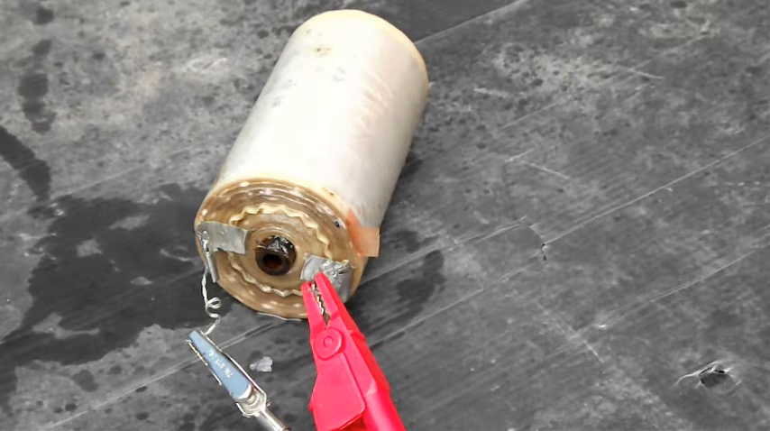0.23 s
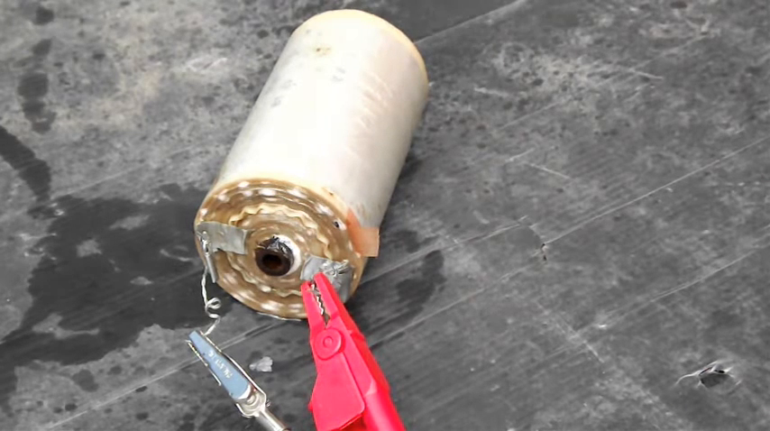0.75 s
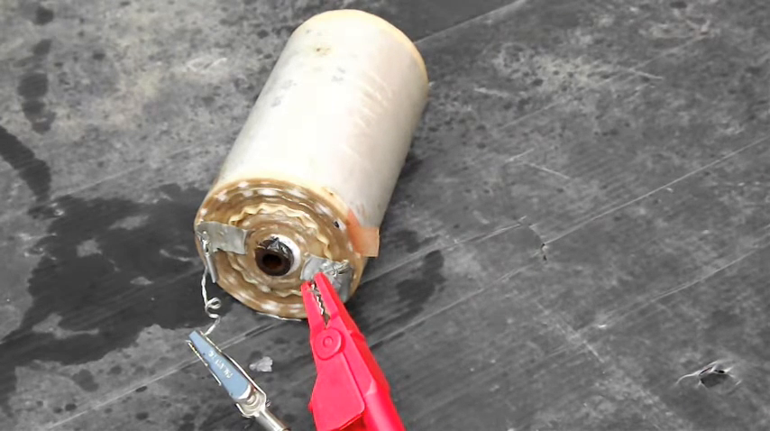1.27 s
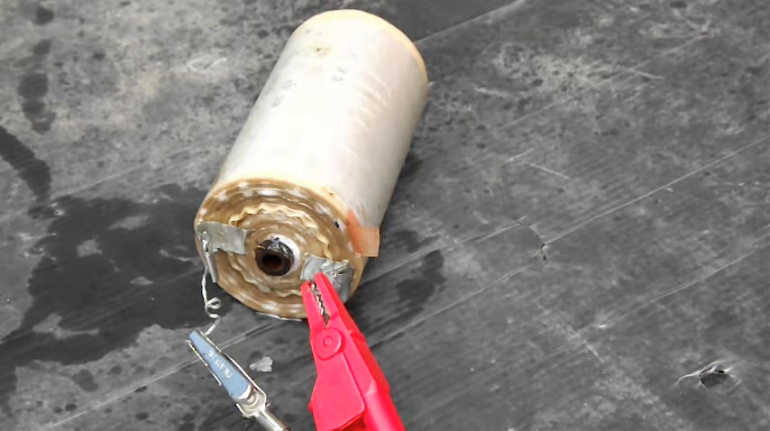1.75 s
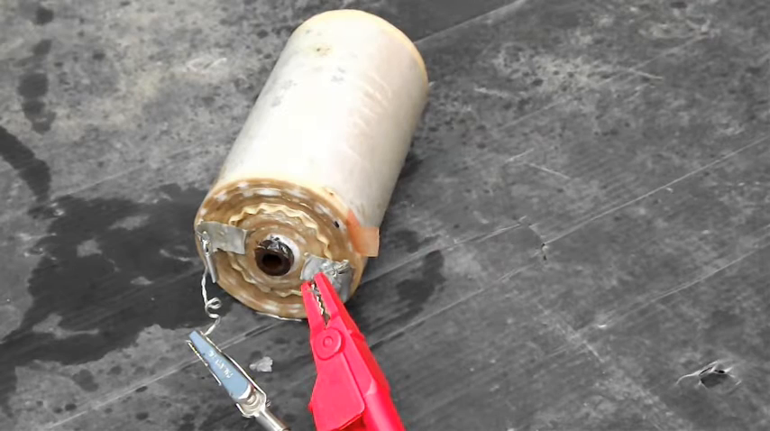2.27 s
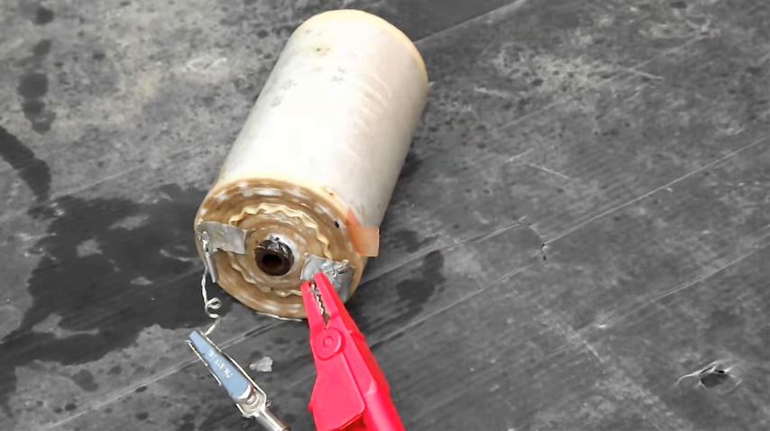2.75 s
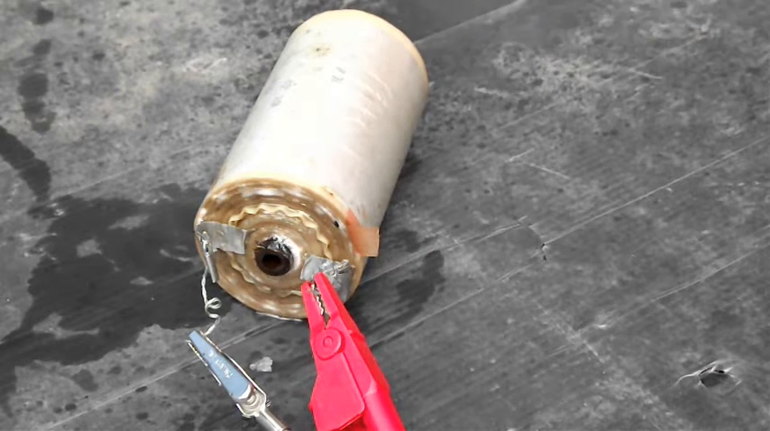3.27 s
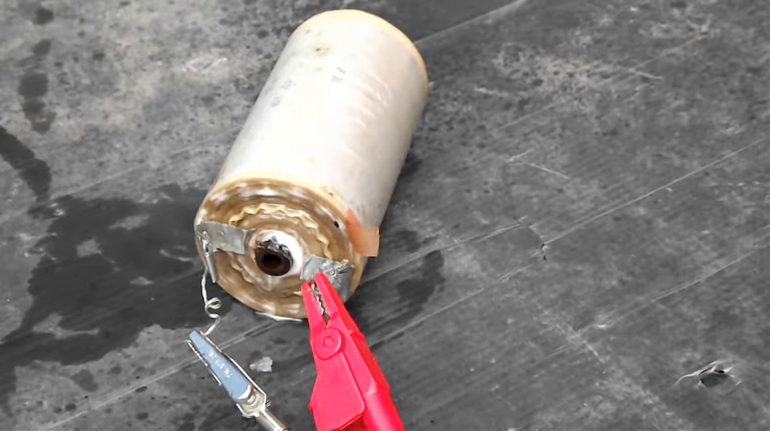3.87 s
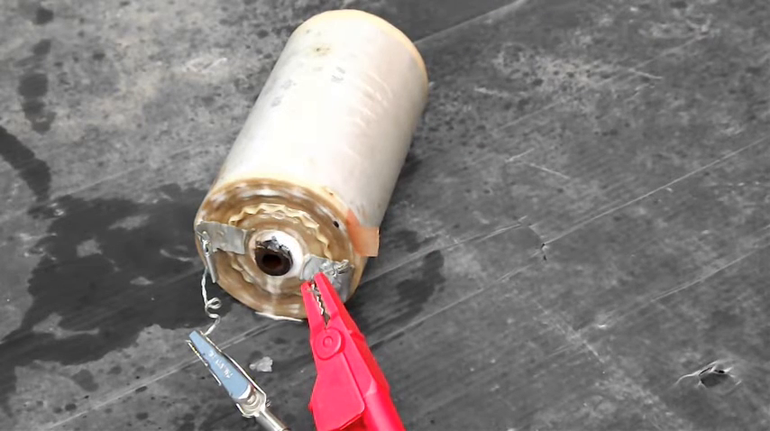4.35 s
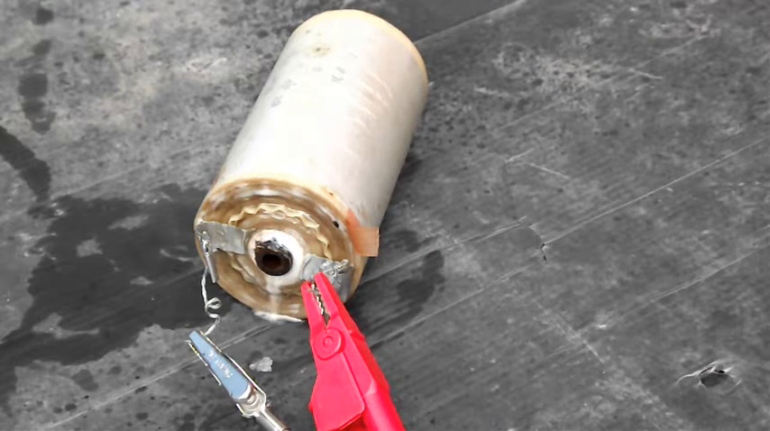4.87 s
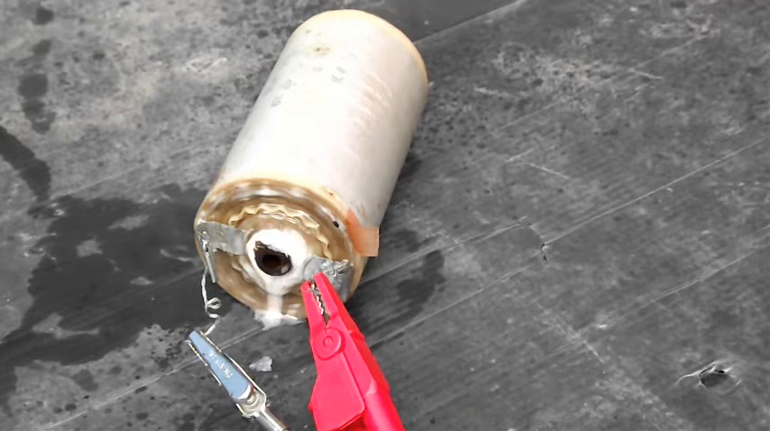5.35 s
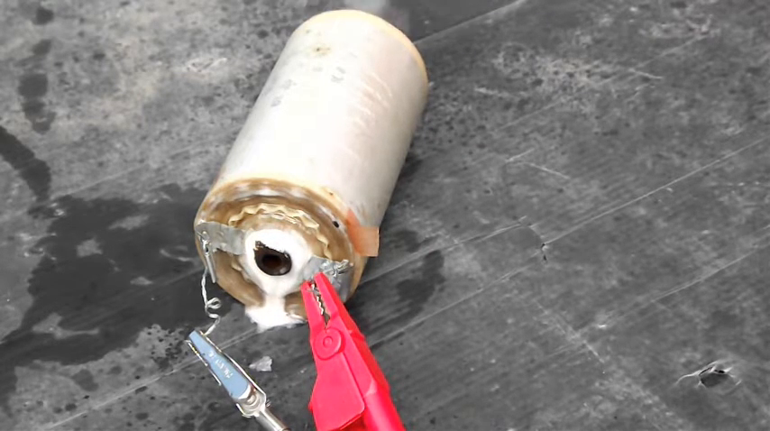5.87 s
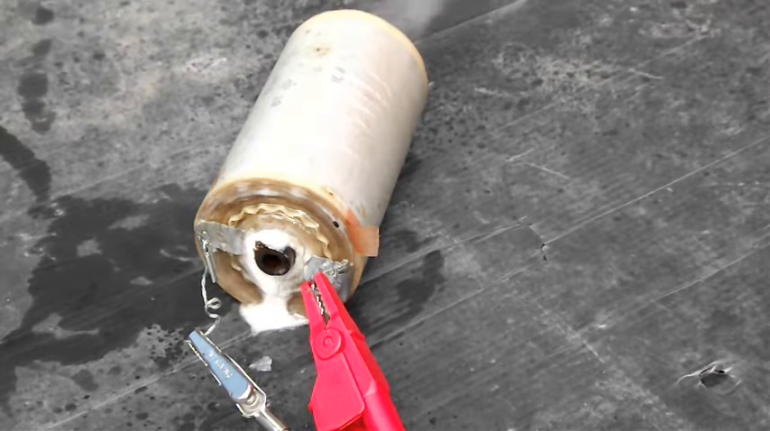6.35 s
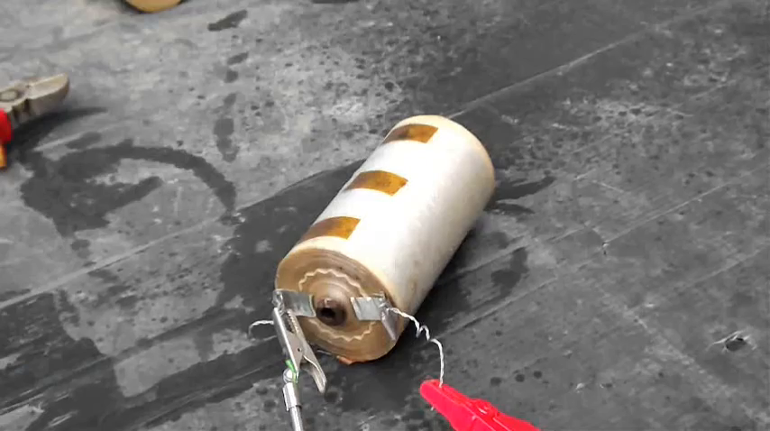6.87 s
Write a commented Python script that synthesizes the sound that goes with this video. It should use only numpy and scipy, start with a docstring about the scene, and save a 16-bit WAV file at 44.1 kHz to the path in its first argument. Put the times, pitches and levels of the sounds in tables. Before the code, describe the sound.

Outdoors on a concrete yard, a soft far-traffic hiss and gusty low wind run throughout, with a faint 64 Hz engine drone sinking away and stopping by 1.8 s. At 0.23-0.45 s a violent ragged cluster of electrical cracks bursts out, hardest around 0.31 s, with a deep puff of gas, then sizzle and dull knocks until 0.8 s. Calm follows, broken by low bumps at 2.3 s and one snap at 2.7 s. From 3.0 to 3.4 s comes a rapid bright volley, strongest at 3.15 s, then slight sizzle and bumps. More cracks snap at 4.7 s and heavily at 5.05-5.15 s. A softer gassy pop gushes at 5.6 s, then faint fizzy ticks until 6.2 s. At 6.86 s nearer traffic rushes in abruptly with a knock. The close microphone rings near 3 kHz, overloads on peaks and dips the background after loud cracks.

```python
"""Sparks crack and ring in a wound capacitor element that breaks down under voltage on a concrete yard.
Each spark is a burst of fading noise sent through a ring, a snap and a bass filter, with echoes after it.
Dull knocks, one puff of gas and two soft gushes join in, and hot wax sizzles as filtered grainy noise.
Behind them are a far town, wind and an engine drone, and a rush of nearer traffic sets in near the end.
The close microphone resonates near 3 kHz, turns itself down after loud cracks and overloads on peaks."""
import sys
import numpy as np
from scipy import signal
from scipy.fft import rfft, irfft
from scipy.io import wavfile
from scipy.ndimage import uniform_filter1d, minimum_filter1d

SR = 44100
rng = np.random.default_rng(int(sys.argv[2]) if len(sys.argv) > 2 else 0)


def wav_out(sig):
    """Save sig, one row per channel (or a flat mono array), as 16-bit PCM at SR to the path in sys.argv[1]."""
    wavfile.write(sys.argv[1], SR, np.round(np.clip(np.atleast_2d(sig).T, -1, 1) * 32767).astype(np.int16))


N = 314163  # length in samples, about 7.1 s


def undb(db):
    """Turn decibels into a plain factor."""
    return 10 ** (np.asarray(db) / 20)


def unit(x):
    """Scale a sound to an rms level of 1."""
    return x / np.sqrt(np.mean(x ** 2))


def band(x, hz, width_hz):
    """Two-pole resonance, gain 1 at the centre."""
    return signal.lfilter(*signal.iirpeak(hz, hz / width_hz, fs=SR), x)


def low(x, hz):
    """Take away the treble above hz with a gentle two-pole filter."""
    return signal.lfilter(*signal.butter(2, min(hz, .45 * SR), fs=SR), x)


def coloured(spectrum):
    """Noise of rms 1 with a (Hz, dB) spectrum, practically silent outside it."""
    hz, db = np.transpose(spectrum)
    f = np.fft.rfftfreq(N, 1 / SR) + 1e-9  # the tiny offset avoids log(0)
    shape = undb(np.interp(np.log(f), np.log(hz), db, left=-90, right=-120))
    white = rng.standard_normal(N)
    return unit(irfft(rfft(white) * shape, N))


def walk(rate):
    """Random wander of spread 1: levels held for 1 / rate seconds, smoothed twice."""
    k = int(SR / rate)
    steps = np.repeat(rng.standard_normal(N // k + 1), k)
    return unit(uniform_filter1d(uniform_filter1d(steps, k), k)[:N])


def fade(t, t60):
    """Exponential fade that loses 60 dB in t60 seconds (1 ms at least)."""
    return np.exp(-np.log(1000) * t / max(t60, 1e-3))


def add(out, s, sound):
    """Mix a sound into out, starting at s seconds."""
    i = int(s * SR)
    out[i:i + len(sound)] += sound[:len(out) - i]


# Colour of the far town murmur. Each row: frequency in Hz, relative strength in dB per Hz.
TOWN_SPECTRUM = [(90, -6), (150, -3), (300, -6.5), (600, -9.5), (1000, -6.5), (2000, -11.5), (3200, -7.5),
                 (5000, -17.5), (7000, -26), (10000, -33), (15200, -37), (15500, -70)]
# Loudness curve of the town before its small swells. Each row: time in seconds, level in dB.
TOWN_LEVEL = [(0, -46.5), (3.4, -47.5), (4.8, -44.5), (5.6, -45), (6.2, -45.5), (7.13, -45)]
TOWN_SWELL_DB = .6


def town(t):
    """Smooth far traffic: coloured noise whose level swells a little at random."""
    level_db = np.interp(t, *np.transpose(TOWN_LEVEL))
    return coloured(TOWN_SPECTRUM) * undb(level_db + TOWN_SWELL_DB * walk(3.91) + .5 * walk(17))


# Colour of the wind rumble. Each row: frequency in Hz, relative strength in dB per Hz.
WIND_SPECTRUM = [(15, 1.5), (30, -3.5), (60, -7), (110, -12), (200, -73)]
# Loudness curve of the wind before its gusts. Each row: time in seconds, level in dB.
WIND_LEVEL = [(0, -46), (3.0, -50.5), (3.9, -46.5), (4.6, -47), (5.4, -50), (6.2, -50), (7.13, -46.5)]


def wind(t):
    """Gusty rumble: very low noise with a wandering level."""
    level_db = np.interp(t, *np.transpose(WIND_LEVEL))
    return coloured(WIND_SPECTRUM) * undb(level_db + 1.2 * walk(5.13))


DRONE_HZ, DRONE_WAVER_HZ = 64., 3.
DRONE_DB, DRONE_SINK_DB_PER_S, DRONE_FLICKER_DB = -41.5, 4, 1.5
DRONE_STOP_S, DRONE_RELEASE_S = 1.65, 0.16


def drone(t):
    """Low engine drone: a sine of wavering pitch."""
    level_db = DRONE_DB - DRONE_SINK_DB_PER_S * t  # the engine draws away, then stops
    pitch_hz = DRONE_HZ + DRONE_WAVER_HZ * walk(9.9)
    tone = np.sin(2 * np.pi * np.cumsum(pitch_hz) / SR)
    stop = np.clip(1 - (t - DRONE_STOP_S) / DRONE_RELEASE_S, 0, 1)
    return tone * undb(level_db + DRONE_FLICKER_DB * walk(3.8)) * stop


# Colour of the nearer traffic. Each row: frequency in Hz, relative strength in dB per Hz.
RUSH_SPECTRUM = [(60, 2), (180, 1), (500, -6), (1200, -11.5), (2500, -8.5), (5000, -19), (8000, -29),
                 (11000, -39)]
RUSH_S, RUSH_ATTACK_S, RUSH_DB = 6.858, 0.0067, -38


def rush(t):
    """Broad rush of nearer traffic: flickering noise that sets in within milliseconds near the end."""
    onset = np.clip((t - RUSH_S) / RUSH_ATTACK_S, 0, 1)
    return coloured(RUSH_SPECTRUM) * undb(RUSH_DB + 1.0 * walk(30)) * onset


# Spells of sizzling hot wax between and around the sparks.
# Each row: start in seconds, hold in seconds, level in dB.
SIZZLES = [(0.458, 0.05, -38), (3.448, 0.015, -47.5), (3.602, .03, -55), (4.613, .07, -44),
           (5.173, .025, -39), (5.515, .005, -51)]
# Rings of the gaps in the winding. Each row: centre in Hz, filter width in Hz, strength in dB.
WAX_RINGS = [(2400, 400, -1), (2900, 500, 0), (5100, 200, 2), (5750, 200, -1), (6800, 2500, -11),
             (8300, 450, -8), (11000, 2500, -17)]
SIZZLE_ATTACK_S, SIZZLE_RELEASE_S, SIZZLE_GRAIN_DB = 0.027, 0.054, 2.5


def sizzle(t):
    """Dense bubble bursts in the wax, ringing in the gaps of the winding: grainy noise through resonances."""
    gain = np.zeros(N)
    for s, hold_s, db in SIZZLES:
        rise = (t - s) / SIZZLE_ATTACK_S
        fall = 1 - (t - s - SIZZLE_ATTACK_S - hold_s) / SIZZLE_RELEASE_S
        gain += undb(db) * np.clip(np.minimum(rise, fall), 0, 1) ** 2
    grains = rng.standard_normal(N) * undb(SIZZLE_GRAIN_DB * walk(120))
    rings = sum(undb(db) * band(band(grains, hz, width), hz, width) for hz, width, db in WAX_RINGS)
    return gain * unit(rings)


# Low knocks and bumps nearby. Each row: start in seconds, peak in dB, centre in Hz.
THUDS = [(0.329, -24.5, 216), (0.561, -29, 175), (0.599, -35, 155.2), (0.655, -34, 191), (0.683, -37, 257),
         (0.764, -32, 196), (0.819, -37, 194), (2.294, -29, 304), (2.35, -35.5, 229), (3.621, -39, 266),
         (3.698, -38, 248), (5.343, -32.5, 326), (5.408, -31.5, 284), (5.595, -29, 162), (6.869, -26, 398),
         (6.96, -36, 186)]
THUD_T60_S, THUD_TOP_HZ = 0.21, 398


def thuds():
    """Dull knocks: a click and a fading noise tail in a wide low resonance."""
    out, t = np.zeros(N), np.arange(SR // 4) / SR
    for s, db, hz in THUDS:
        hit = (rng.standard_normal(len(t)) + 22.0 * (t == 0)) * fade(t, THUD_T60_S)
        knock = low(low(band(hit, hz, 0.82 * hz), THUD_TOP_HZ), THUD_TOP_HZ)
        add(out, s, undb(db) * knock / np.abs(knock).max())
    return out


# Soft gushes of gas in the late pop. Each row: start in seconds, level before the fade in dB,
# time to fade by 60 dB in seconds.
GUSHES = [(5.596, -27, 0.1), (5.611, -32.5, 0.31)]
GUSH_HZ, GUSH_WIDTH_HZ, GUSH_ATTACK_S = 1290, 3800, .002


def gushes():
    """Gas escaping softly: a wide band of noise that starts fast and fades, cut off after a quarter second."""
    out, t = np.zeros(N), np.arange(SR // 4) / SR
    for s, db, t60 in GUSHES:
        hiss = unit(low(band(rng.standard_normal(len(t)), GUSH_HZ, GUSH_WIDTH_HZ), 2900.0))
        add(out, s, undb(db) * hiss * (1 - np.exp(-t / GUSH_ATTACK_S)) * fade(t, t60))
    return out


# Puff of gas from the strongest blow-out. Each row: moment of the swing in seconds,
# peak before smoothing in dB, time constants of suction and push in seconds.
BLASTS = [(.3246, -6.0, .0025, .004)]


def blast(t):
    """One deep swing of air pressure: suction grows, flips to a push and dies away."""
    out = np.zeros(N)
    for s, db, suction_s, push_s in BLASTS:
        u = t - s
        swing = np.sign(u) * np.exp(-np.abs(u) / np.where(u < 0, suction_s, push_s))
        out += undb(db) * uniform_filter1d(swing, size=60)  # rounds the sharp flip
    return out


# Sparks. Each row: start in seconds, peak of the ring in dB, ring in Hz, time for the arc to fade
# by 60 dB in seconds, snap and bass in dB against the ring. Peaks are before the treble softening.
CRACKS = [(0.2343, -11, 3760, 0.0051, 2, -14), (0.3043, -3, 3400, 0.0073, 12, -11),
          (0.3139, 2.5, 2940, 0.024, 5.5, -18), (0.3227, -6, 5900, .01, -1, -1.5),
          (0.342, -14, 4900, .004, 12, -12), (0.3465, -17, 2840, .004, -6, -6),
          (0.3842, -21, 2840, 0.0043, 6.5, -18), (0.4235, -18, 2360, 0.0055, 2, -4),
          (0.4538, -18.5, 4940, 0.0072, -4, -2), (0.7428, -33, 2810, .005, 0, -24),
          (2.6996, -19.5, 2620, 0.0074, 3.5, -25), (3.0174, -6, 4900, 0.0068, -0.5, -26),
          (3.0583, -12, 4830, 0.007, 3, -29), (3.078, -18, 4060, 0.0047, 3, -15),
          (3.0968, -14, 4520, 0.0062, 6, -32), (3.1281, -10, 4080, 0.0059, 7, -32),
          (3.149, 4, 5050, 0.017, 6, -1), (3.159, -6, 4070, 0.0051, 4, -26),
          (3.2073, -16, 3360, 0.0026, 3, -13), (3.2182, -18, 3500, 0.0033, 2, -17),
          (3.2591, -15.5, 3630, 0.005, 4.5, -1), (3.3071, -13, 3880, 0.0048, -3, -14),
          (3.32, -27, 8980, .004, -7, -1), (3.3686, -13.5, 4330, 0.0074, 4, -22),
          (4.684, -14.5, 4800, 0.0065, -1.5, -26), (4.735, -16.5, 3100, 0.0092, 2.5, -25),
          (4.7662, -7.5, 5200, 0.0066, 4.5, -22), (4.7854, -13.5, 3170, .006, 2.5, -18),
          (5.0541, -9.5, 2570, .012, -1, -8), (5.063, -9, 4420, 0.0038, -10, -11),
          (5.0643, -1, 2800, .006, -4, -5), (5.1143, -5, 2900, .006, 2.5, -13),
          (5.1229, -11, 4200, 0.0033, -8, -14), (5.1335, 4.5, 2480, .011, 6, 4.5),
          (5.141, -7, 4170, 0.036, 3.5, -5.5), (5.5389, -39, 5000, .04, -7, -21),
          (5.5972, -16.5, 2780, 0.087, -14, -12), (5.6107, -24.5, 2980, 0.034, -24, -12),
          (5.809, -37.5, 6500, .07, -7, -25), (5.902, -42, 6000, .05, -5, -25),
          (5.985, -36, 6100, 0.041, -22, -25), (6.040, -36.5, 6460, .04, -7, -25),
          (6.185, -36, 5340, .06, -4, -25)]
RING_SHARPNESS = 2.3  # centre over width
SNAP_HZ, SNAP_WIDTH_HZ, BASS_HZ, BASS_WIDTH_HZ, SOFT_TOP_HZ = 6940, 6530, 1290, 1900, 12140
ECHO_DELAY_S, ECHO_RISE_S, ECHO_T60_S, ECHO_TOP_HZ = .005, 0.0023, 0.058, 9000
YARD_DB, YARD_T60_S = -21.5, 0.58
ECHO_DB, ECHO_PER_DB = -26.5, -0.06  # share of a 0 dB spark; weaker sparks get a larger share


def cracks():
    """Each spark is a short ragged burst: a ring of the winding, a bright snap, some bass; surfaces return it."""
    out, t, late = np.zeros(N), np.arange(2048) / SR, np.arange(SR // 2) / SR
    # early reflections swell in and die fast, over a longer, weaker yard tail
    tails = fade(late, ECHO_T60_S) + undb(YARD_DB) * fade(late, YARD_T60_S)
    decay = (1 - np.exp(-late / ECHO_RISE_S)) * tails
    for s, db, ring_hz, t60, snap_db, bass_db in CRACKS:
        noise = rng.standard_normal(len(t) + len(late))
        arc = (noise[:len(t)] + 4.85 * (t == 0)) * fade(t, t60)  # a click, then fading noise
        # each spark sits elsewhere in the winding and so meets its own pattern of echoes
        pattern = undb(28.0 * uniform_filter1d(noise[:len(late)], size=150))
        echo = low(noise[len(t):] * pattern * decay, ECHO_TOP_HZ)  # walls and air take the treble
        echo_db = ECHO_DB + ECHO_PER_DB * db
        parts = [(ring_hz, ring_hz / RING_SHARPNESS, 0),
                 (SNAP_HZ, SNAP_WIDTH_HZ, snap_db),
                 (BASS_HZ, BASS_WIDTH_HZ, bass_db)]
        for centre, width, share_db in parts:
            # two wider passes together are about as narrow as one
            part = band(band(arc, centre, 1.46 * width), centre, 1.46 * width)
            add(out, s, undb(db + share_db) * part / np.abs(part).max())
            # the root makes up for the noise lost in a narrow band
            returned = band(echo, centre, width) * np.sqrt(SR / 4 / width)
            add(out, s + ECHO_DELAY_S, undb(db + share_db + echo_db) * returned)
    return low(low(out, SOFT_TOP_HZ), SOFT_TOP_HZ)


def scene():
    """Mix all sources into one channel."""
    t = np.arange(N) / SR
    background = town(t) + wind(t) + drone(t) + rush(t)
    return (background + sizzle(t) + thuds() + gushes() + blast(t) + cracks())[None]


PORT_HZ, PORT_WIDTH_HZ, PORT_DB = 3190, 480, 11
# Automatic gain control, a slow and a quick stage. Each row: threshold in dB,
# dB of turning down per dB above it, hold in seconds, smoothing time in seconds.
DUCKS = [(-5, 1.78, 0.25, 0.11), (-14, 0.66, 0.035, 0.1)]
CLIP, TOP_HZ = .5, 16200  # overload ceiling (1 is full scale), top cut


def record(dry):
    """Microphone: port resonance, gain control that holds after loud peaks, overload, top cut."""
    x = dry + (undb(PORT_DB) - 1) * band(dry, PORT_HZ, PORT_WIDTH_HZ)
    level_db = 20 * np.log10(uniform_filter1d(np.abs(x), size=256) + 1e-9)
    for from_db, slope, hold_s, slew_s in DUCKS:
        hold, slew = int(hold_s * SR), int(slew_s * SR)
        over_db = np.maximum(level_db - from_db, 0)
        # both windows look only backwards; the first keeps the largest recent excess
        held_db = -minimum_filter1d(-over_db, size=hold, origin=(hold - 1) // 2)
        smooth_db = uniform_filter1d(held_db, size=slew, origin=(slew - 1) // 2)
        x = x * undb(-slope * smooth_db)
    x = x / (1 + np.abs(x / CLIP) ** 4) ** .25  # bends peaks towards the ceiling
    return signal.sosfilt(signal.ellip(8, .2, 70, TOP_HZ, fs=SR, output="sos"), x)


dry = scene()
out = record(dry)
wav_out(out)
```